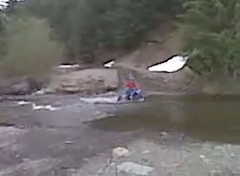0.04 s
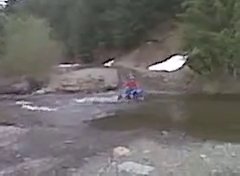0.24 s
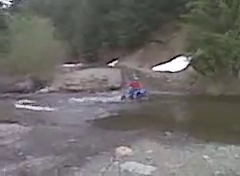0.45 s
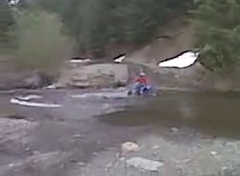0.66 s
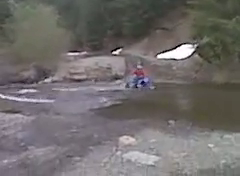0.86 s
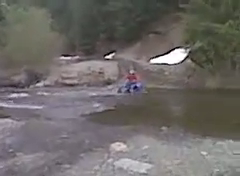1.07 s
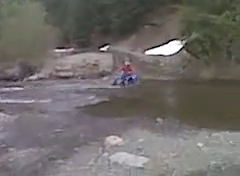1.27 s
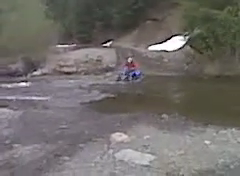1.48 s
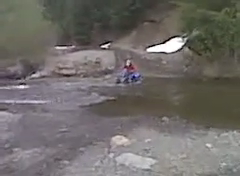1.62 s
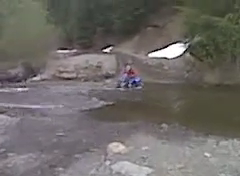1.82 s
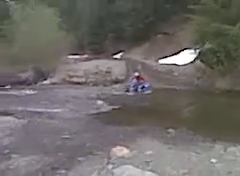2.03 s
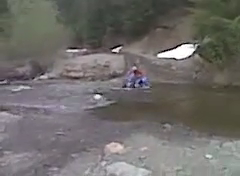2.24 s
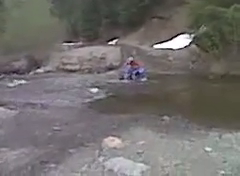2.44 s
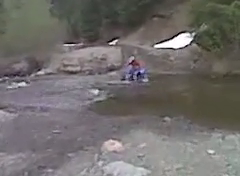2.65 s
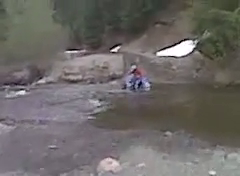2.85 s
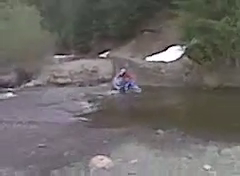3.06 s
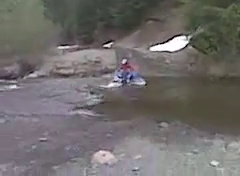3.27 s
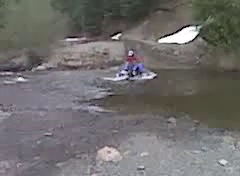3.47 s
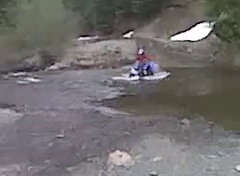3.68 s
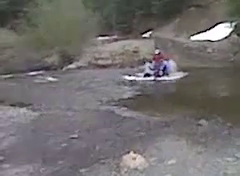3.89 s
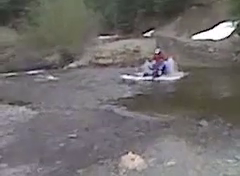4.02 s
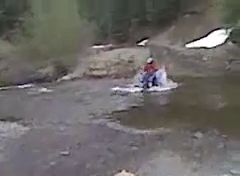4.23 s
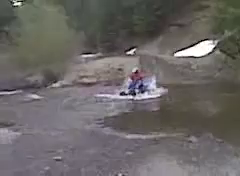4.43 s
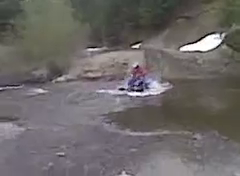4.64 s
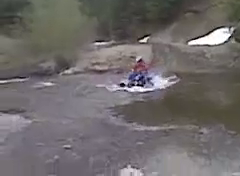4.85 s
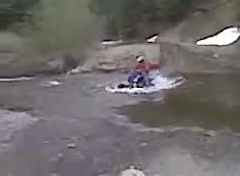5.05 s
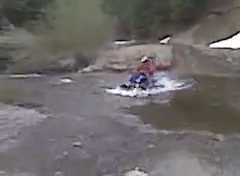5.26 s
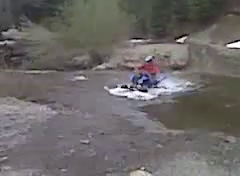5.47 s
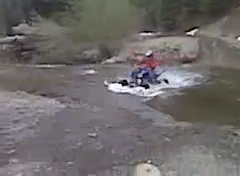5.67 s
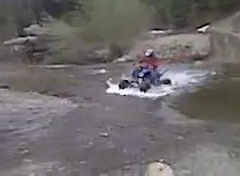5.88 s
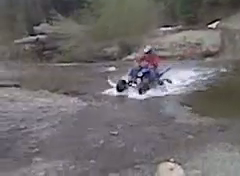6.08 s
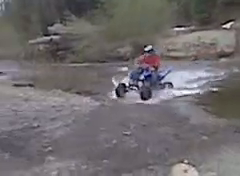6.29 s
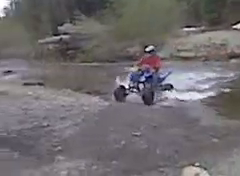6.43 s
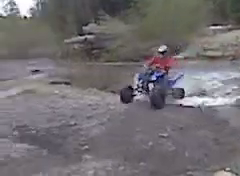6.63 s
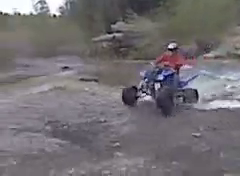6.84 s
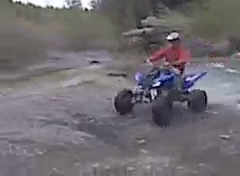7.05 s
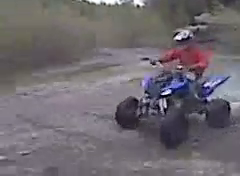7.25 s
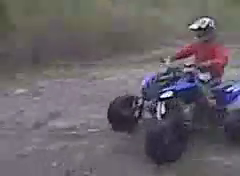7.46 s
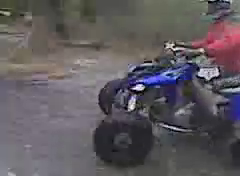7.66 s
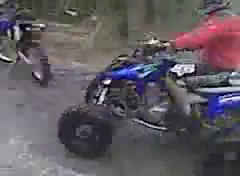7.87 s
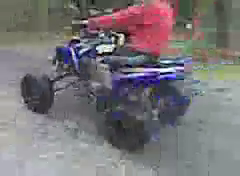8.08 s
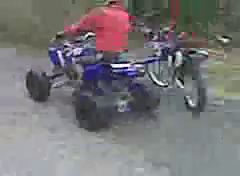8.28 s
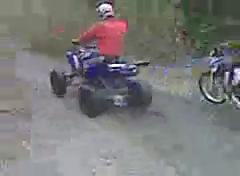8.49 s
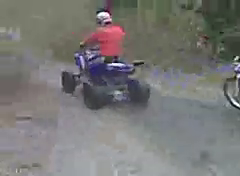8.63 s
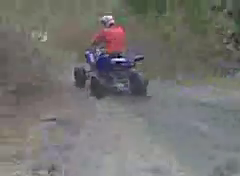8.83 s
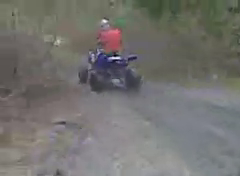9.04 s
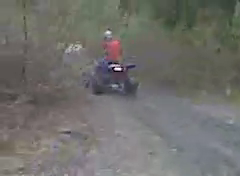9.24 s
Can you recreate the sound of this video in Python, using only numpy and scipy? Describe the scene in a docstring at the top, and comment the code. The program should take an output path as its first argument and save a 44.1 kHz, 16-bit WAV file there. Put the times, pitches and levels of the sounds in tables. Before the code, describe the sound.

Over a rushing creek, a quad bike engine revs up and down, splashes nearer, clatters loudly past on gravel and eases off.

```python
"""A single-cylinder quad bike idles across a creek, revs in surges through the water, climbs the gravel
bank, passes close to a small camera and rolls away off the throttle, its tailpipe popping.
Each firing sends a pulse down the exhaust and rattles the engine; the wheels throw water and stones.
The creek rushes underneath and the banks echo. The highs are cut and the sound overloads at the pass."""
import sys
import numpy as np
from scipy import signal
from scipy.fft import rfft, irfft, next_fast_len
from scipy.io import wavfile
from scipy.ndimage import uniform_filter1d, map_coordinates

SR = 44100
rng = np.random.default_rng(int(sys.argv[2]) if len(sys.argv) > 2 else 0)


def store_wav(level_fs):
    """Save 16-bit WAV to argv[1]."""
    pcm = np.round(np.clip(np.atleast_2d(level_fs), -1, 1) * 32767)
    wavfile.write(sys.argv[1], SR, pcm.T.astype(np.int16))


N = 410571
TIME = np.arange(N) / SR

# Engine speed. Each row: time in seconds, firings per second.
FIRING_RATE = [(0.0, 11.42), (0.88, 11.39), (0.96, 19.26), (1.1, 35.12), (1.25, 47.1), (1.38, 55.4),
               (1.52, 60.01), (1.63, 63.19), (1.7, 59.53), (1.9, 49.58), (2.1, 41.08), (2.34, 31.77),
               (2.45, 36.53), (2.62, 44.88), (2.76, 39.87), (3.03, 37.84), (3.3, 28.24), (3.42, 32.05),
               (3.6, 43.86), (3.76, 54.16), (3.9, 54.72), (4.01, 56.29), (4.13, 50.46), (4.28, 53.13),
               (4.5, 43.87), (4.8, 40.33), (4.97, 42.72), (5.3, 40.49), (5.53, 37.03), (5.82, 40.23),
               (6.08, 38.95), (6.3, 44.51), (6.55, 46.95), (6.8, 41.69), (6.98, 40.18), (7.21, 50.47),
               (7.34, 42.52), (7.52, 43.12), (7.72, 38.43), (7.9, 41.45), (8.04, 44.9), (8.22, 34.7),
               (8.55, 31.98), (8.85, 28.62), (9.31, 23.93)]
# Throttle moves, each briefly raising or lowering the bark and the boom.
# Each row: start and length in seconds, change of bark and of boom in dB.
TWISTS = [(0.948, .69, 8, 1), (1.752, 0.2, -0.5, -3.5), (2.159, 0.22, -8.5, -5.5), (2.409, 0.3, 2.5, 4),
          (2.712, .34, 3, 4), (3.091, 0.24, -2, -2.5), (3.386, 0.35, 5, 3), (3.771, 0.28, 8.5, -4.5),
          (4.058, .25, 3, 3), (4.689, 0.49, -5.5, 1), (5.993, 0.42, -2, 3), (7.03, 0.95, -4, 1),
          (7.636, .41, 6.5, 2.5), (8.079, 0.21, -2.5, -2)]
# Hard work makes burning ragged. Each row: time in seconds, added roughness from 0 to 1.
STRAIN = [(3.5, 0), (4.3, .04), (4.7, .12), (6.2, .12), (7.2, .25), (7.8, .1), (8.4, .01)]
# Pops and misfires off the throttle. Each row: time in seconds, dB against a normal firing.
POPS = [(8.572, 3.5), (8.604, 1.5), (8.635, 4), (8.801, 1.5), (8.835, -8), (8.978, -7), (9.169, 3),
        (9.21, -1.5)]
# The quad comes and goes. Each row: time in seconds, base levels of boom, bark and clatter in dB.
DRIVE_BY = [(.8, -45.5, -51, -38), (1.0, -24.5, -33.5, -39.5), (1.3, -28.5, -31.5, -35),
            (1.9, -25.5, -26, -34.5), (2.45, -30, -26.5, -38.5), (2.68, -30.5, -25.5, -40.5),
            (3.2, -26, -28.5, -34.5), (4.6, -21, -34.5, -31.5), (5.45, -22.5, -27.5, -29),
            (6.0, -21, -31.5, -28.5), (6.9, -19.5, -22, -24), (7.5, -27, -26, -19.5),
            (7.72, -28.5, -22, -14), (7.8, -29.5, -23.5, -14), (8.02, -32.5, -21.5, -12.5),
            (8.4, -32, -17, -16.5), (8.85, -27, -20.5, -22.5), (9.3, -30, -26.5, -24.5)]
# The tailpipe turns to the camera. Each row: time in seconds, share heard from behind from 0 to 1.
REAR_SHARE = [(7.3, 0), (8.1, 0), (8.35, .97), (9.3, 1)]
# Water over the tailpipe. Each row: time in seconds, flutter strength in dB (0 wavers by about 2 dB).
CHOKE = [(3.3, -6), (4.5, 7.5), (6.2, 0.5), (7, -16.5)]

# Ringing pitches that drift. Each row: time in seconds, pitch in Hz.
BARK_PEAK_PITCH = [(1.15, 813), (1.6, 883), (2.15, 726), (2.44, 954), (2.83, 790), (3.001, 878),
                   (3.131, 634), (3.599, 840), (4.0, 918)]  # a ringing peak in the exhaust bark wanders up and down
CASING_PITCH = [(5.6, 2470), (6.7, 2560), (7.349, 2690), (7.8, 2460), (7.952, 2320), (8.15, 2056)]  # shifts as the quad turns and passes

# Tone colours. Each row: frequency in Hz, relative level in dB.
CREEK_COLOUR = [(24, -51), (40, -13.5), (130, -12), (229, -3.5), (307, -2), (419, -5.5), (530, 0),
                (698, 0.5), (1140, 2), (1650, -7), (2130, -2.5), (3210, -8.5), (3690, -18.5), (4310, -37),
                (5600, -62), (9480, -120)]
BOOM_COLOUR = [(15, -77), (110, -25.5), (160, -15), (215, -0.5), (270, 2.5), (330, -1), (390, -17),
               (500, -10.5), (610, -5), (720, -24.5), (1200, -67.5)]
FRONT_BARK_COLOUR = [(60, -55.5), (250, -24), (340, -2.5), (400, -5), (470, 3), (540, 2), (620, 7),
                     (720, -8.5), (810, -5), (890, -1.5), (1020, -14), (1300, -26.5), (1700, -15),
                     (3300, -35.5), (4400, -61)]
REAR_BARK_COLOUR = [(60, -52.5), (250, -15.5), (420, -19.5), (550, -3.5), (660, 3.5), (780, 13), (900, -2),
                    (1200, 0), (1500, -10.5), (2700, 1), (3500, -12), (4400, -45.5)]
CLATTER_COLOUR = [(60, -50.5), (500, -6.5), (900, -4), (1250, -4), (1550, -8), (1900, -5.5), (2200, 0),
                  (2480, 0), (2750, -0.5), (3000, -5), (3350, -6.5), (3700, -16), (4400, -40)]
RUMBLE_COLOUR = [(12, -43.5), (45, -10), (80, -3), (130, -3), (250, -26.5), (600, -61.5)]
SPRAY_COLOUR = [(20, -55.5), (400, 10.5), (1100, 7.5), (1600, -9), (2500, -11.5), (3300, 1), (3800, -15.5),
                (4400, -41)]
SPLASH_COLOUR = [(300, -36.5), (1200, -19.5), (2600, 0.5), (3400, -12.5), (4400, -39)]
GRAVEL_COLOUR = [(20, -53.5), (160, -9), (320, -4.5), (430, -6), (650, 1), (1000, 2), (1300, 0),
                 (1600, -15), (2600, -11.5), (4400, -43.5)]

# How sounds swell and fade. Each row: time in seconds, base level in dB.
RUMBLE_LEVEL = [(0, -61.5), (2.5, -53.5), (4.2, -50), (7.3, -44.5), (9.3, -40.5)]
SPRAY_LEVEL = [(1.1, -40.5), (1.4, -40.5), (3.3, -33), (3.9, -34), (5, -34.5), (6.2, -29), (7.4, -46)]
GRAVEL_LEVEL = [(3.6, -44.5), (5.9, -44.5), (6.7, -26.5), (7.22, -17), (7.5, -23), (8.3, -18), (9.3, -25)]
CHAIN_LEVEL = [(5.2, -41), (6.55, -39.5), (6.7, -27), (6.95, -28), (7.3, -17.5), (7.42, -22.5), (7.6, -48)]
INTAKE_LEVEL = [(7.6, -32), (7.74, -21), (7.775, -6), (7.92, -6.3), (8.06, -6.5), (8.09, -14), (8.14, -28)]  # loud while the intake faces the camera

# How chain links and airbox ring. Each row: pitch in Hz, width in Hz, relative level in dB.
LINK_MODES = [(2660, 300, 0)]
AIRBOX_MODES = [(619, 58, 16.5), (312, 60, 5), (2440, 170, 7)]

# Engine rasps. Each row: start and length in seconds, level in dB, pitch in Hz.
RASPS = [(1.535, .105, -29, 3100), (1.595, .17, -33.5, 2480), (3.67, .57, -41, 3280),
         (4.33, .19, -35, 2660)]
# Wheels slap the water. Each row: start in seconds, base level in dB, centre pitch in Hz.
SPLASHES = [(3.625, -29, 2900), (3.69, -25, 2570), (4.05, -28, 2000), (4.225, -20.5, 2560),
            (5.38, -25, 2650), (5.8, -29.5, 2600), (6.3, -21.5, 2590), (6.68, -22, 2650)]
# Bubbles at the tailpipe. Each row: start in seconds, base level in dB.
GLUGS = [(4.468, -17), (4.72, -17), (4.748, -16), (5.097, -16), (5.18, -18), (5.428, -12), (5.452, -17),
         (6.018, -13), (6.062, -16), (6.118, -13), (6.282, -13)]
# A steel part rings. Each row: start and length in seconds, level in dB.
STEEL_RINGS = [(6.994, .36, -18.5), (7.696, 0.19, -18.5)]
# Stones hit the chassis. Each row: start in seconds, relative level in dB.
KNOCKS = [(7.15, 4), (7.224, -1), (7.256, 1.5), (7.441, -3), (7.521, -3.5)]

CRUISE_HZ, TOP_SPEED_HZ = 40, 62.6  # firings per second
WRIST_S = .04  # the time a twist takes


def amp(db):
    """Turn decibels into a gain."""
    return 10 ** (np.asarray(db) / 20)


def unit(x):
    """Scale to an average power of 1."""
    return x / np.sqrt(np.mean(x ** 2) + 1e-20)


def curves(rows):
    """One value per sample for each column after the time."""
    times, *columns = np.transpose(rows)
    return [np.interp(TIME, times, column) for column in columns]


def swell(rows):
    """Gain that follows a level table and fades out beyond its ends."""
    outside = np.maximum(rows[0][0] - TIME, 0) + np.maximum(TIME - rows[-1][0], 0)
    return amp(curves(rows)[0] - 120 * outside)


def gate(start, length, fade):
    """Fade from 0 to 1 at start and back after length; all in seconds."""
    return np.clip(np.minimum(TIME - start, start + length - TIME) / fade + .5, 0, 1)


def wobble(rate):
    """A smooth curve through rate random points a second."""
    return map_coordinates(rng.standard_normal(int(N * rate / SR) + 4), [TIME * rate])


def coloured(x, colour, size=8192):
    """Filter x to a tone colour, at power 1."""
    hz, db = np.transpose(colour)
    log_gain = np.log(amp(np.interp(np.log(np.fft.rfftfreq(size, 1 / SR) + 1), np.log(hz), db)))
    cepstrum = irfft(log_gain) * (1 + np.sign(size / 2 - np.arange(size)))  # no ringing before a hit
    response = irfft(np.exp(rfft(cepstrum)))[:size // 2]
    return unit(signal.oaconvolve(x, response)[:N])


def resonate(x, modes):
    """Let x ring at fixed pitches, at power 1."""
    t = TIME[:SR // 4]
    ring = sum(amp(db) * width * np.exp(-np.pi * width * t) * np.cos(2 * np.pi * hz * t)
               for hz, width, db in modes)
    return unit(signal.oaconvolve(x, ring)[:N])


def peaked(x, pitches, width_hz, peak_db, waver_hz):
    """Boost x around a moving, wavering pitch, at power 1."""
    turn = np.exp(2j * np.pi * np.cumsum(curves(pitches)[0] + waver_hz * wobble(13)) / SR)
    keep = np.exp(-np.pi * width_hz / SR)
    ring = 2 * (turn * signal.lfilter([1 - keep], [1, -keep], x / turn)).real
    return unit(x + (amp(peak_db) - 1) * ring)


def doublings(speed):
    """How many times the speed has doubled from cruising."""
    return np.log2(speed / CRUISE_HZ)


def creek():
    """Shallow water ripples steadily over stones."""
    ripple_db = 1.7 * wobble(120) + .4 * wobble(3)
    return amp(-38.5) * coloured(rng.standard_normal(N) * amp(ripple_db), CREEK_COLOUR)


def roughness(speed):
    """How ragged the burning is, from 0 to 1: more at low speed and under strain."""
    ragged = np.minimum(.06 * (CRUISE_HZ / speed) ** 2.2, .4)
    return np.clip(ragged + curves(STRAIN)[0], 0, 1)


def firings(cycles, rough, scatter_db, limp_db):
    """One kick a cycle; ragged burning scatters the sizes, and a limp weakens every other one."""
    at = np.flatnonzero(np.diff(np.floor(cycles)) > 0)
    db = scatter_db * np.sqrt(rough[at]) * rng.standard_normal(len(at))
    db += limp_db * (-1) ** np.arange(len(at))
    for start, pop_db in POPS:
        db[np.argmin(np.abs(at / SR - start))] = pop_db
    return unit(np.bincount(at, amp(db) * np.sqrt(np.gradient(at)), N))  # same power at any speed


def gusts(kicks, life_s, floor):
    """Rushing noise flares at each kick and dies back to a steady floor."""
    power = signal.lfilter([1], [1, -np.exp(-2 / (life_s * SR))], kicks ** 2)
    return unit(np.sqrt(power / power.mean() + floor) * rng.standard_normal(N))


def puffs(kicks, rough, life_s, floor):
    """Each puff mixes a clean pressure kick with its gust of noise."""
    share = np.clip(rough, 0, 1)
    return np.sqrt(1 - share) * kicks + np.sqrt(share) * gusts(kicks, life_s, floor)


def pipe(x, round_trip_s, bounce):
    """Each pulse runs up and down the pipe, and part escapes on every trip."""
    size = next_fast_len(N + SR // 4)
    delay = np.exp(-2j * np.pi * np.fft.rfftfreq(size, 1 / SR) * round_trip_s)
    return irfft(rfft(x, size) * (delay - bounce) / (1 - bounce * delay), size)[:N]


def boom(cycles, rough):
    """The pulses boom low in the silencer."""
    thumps = firings(cycles, rough, scatter_db=2.5, limp_db=-.74)
    gas = puffs(thumps, 2.38 * rough, life_s=.02, floor=.08)
    return coloured(pipe(gas, round_trip_s=.003686, bounce=.42), BOOM_COLOUR)


def bark(cycles, rough):
    """The pulses bark from the pipe, more sharply when heard from behind."""
    kicks = firings(cycles, rough, scatter_db=6, limp_db=-.5)
    front = puffs(kicks, .4 * rough, life_s=.008, floor=.05)
    front = coloured(pipe(front, round_trip_s=.0036, bounce=.74), FRONT_BARK_COLOUR)
    front = peaked(front, BARK_PEAK_PITCH, width_hz=100, peak_db=10.5, waver_hz=24)
    front *= amp(2 * swell(CHOKE) * wobble(13))  # water chokes the pipe unevenly
    back = puffs(kicks, 3 * rough, life_s=.006, floor=.002)
    back = coloured(pipe(back, round_trip_s=.003, bounce=.58), REAR_BARK_COLOUR)
    rear, = curves(REAR_SHARE)
    return amp(-2.5) * np.sqrt(1 - rear) * front + amp(-.3) * np.sqrt(rear) * back


def drone(cycles):
    """The pipe drones at four times the firing rate."""
    return np.sqrt(2) * np.sin(8 * np.pi * cycles + .15 * wobble(45)) * amp(1.8 * wobble(55))


def exhaust(cycles, rough, speed, twist_bark_db, twist_boom_db):
    """Boom, bark and drone grow with speed; near the top, an open throttle hardens the bark."""
    gain_hz_per_s = uniform_filter1d(np.gradient(speed), round(WRIST_S * SR)) * SR
    opening = np.clip(gain_hz_per_s / 7, 0, 1)  # open while the engine speeds up
    flat_out = np.exp(np.minimum(speed - TOP_SPEED_HZ, 0) / 3.2)  # 1 at top speed
    boom_db, bark_db, _ = curves(DRIVE_BY)
    boom_db += twist_boom_db + 1.5 * doublings(speed)
    bark_db += twist_bark_db + 3.5 * doublings(speed) + 7 * opening * flat_out
    too_slow_db = 2.5 * np.maximum(52 - speed, 0)  # the drone fades below 52 firings a second
    drone_db = boom_db - 2.5 + 11 * flat_out - too_slow_db
    return (amp(boom_db - 3) * boom(cycles, rough) + amp(bark_db) * bark(cycles, rough)
            + amp(drone_db) * drone(cycles))


def ticking(cycles):
    """Valves and chain tick unevenly, six times a cycle."""
    at = np.flatnonzero(np.diff(np.floor(6 * cycles)) > 0)
    return unit(np.bincount(at, amp(2.4 * rng.standard_normal(len(at))), N))


def clatter(cycles, rough, speed, ticks, twist_boom_db):
    """Firings and ticks rattle the engine casing."""
    kicks = firings(cycles, rough, scatter_db=6, limp_db=4.5)
    rattle = gusts(kicks, life_s=.043, floor=.57) + amp(-1.5) * gusts(ticks, life_s=.0039, floor=.051)
    casing = peaked(coloured(rattle, CLATTER_COLOUR), CASING_PITCH, width_hz=150, peak_db=5, waver_hz=70)
    db = curves(DRIVE_BY)[2] - .5 + 6 * doublings(speed) + .11 * twist_boom_db
    db -= 4 * curves(REAR_SHARE)[0]  # the body hides the casing from behind
    return amp(db + 1.2 * wobble(18) + wobble(4.4)) * casing


def wheels(speed):
    """Tyres rumble, throw clumps of spray and crunch over gravel, louder with speed."""
    rumble = swell(RUMBLE_LEVEL) * amp(2) * coloured(rng.standard_normal(N), RUMBLE_COLOUR)
    drops = rng.standard_normal(N) * amp(3.2 * wobble(300) + 1.5 * wobble(12))
    spray = swell(SPRAY_LEVEL) * coloured(drops, SPRAY_COLOUR)
    grit = rng.standard_normal(N) * amp(2.7 * wobble(200))
    crunch = swell(GRAVEL_LEVEL) * coloured(grit, GRAVEL_COLOUR)
    return amp(16 * doublings(speed)) * (rumble + spray + crunch)


def bank_echo(x, decay_s=.18, rise_s=.025):
    """Rocks and trees scatter a short echo back."""
    t = TIME[:SR // 2]
    tail = rng.standard_normal(len(t)) * amp(-60 * t / decay_s) * (1 - np.exp(-t / rise_s))
    return signal.oaconvolve(x, tail / np.linalg.norm(tail))[:N]


def rasp(cycles, speed, lead_cycles=.3, rise_s=.0032):
    """Under hard load the engine rings in a short metallic burst just ahead of each firing."""
    age = (cycles + lead_cycles) % 1 / speed
    burst = unit(age * np.exp(-age / rise_s) * amp(1.2 * wobble(60)))
    smear = 1.15 * wobble(420)
    tones = sum(amp(db) * gate(start, length, WRIST_S) * np.sin(2 * np.pi * hz * age + smear)
                for start, length, db, hz in RASPS)
    return np.sqrt(2) * burst * tones


def splashes(decay_s=.087, rise_s=.015):
    """The wheels slap up bursts of drops."""
    slaps = np.zeros(N)
    for start, db, _ in SPLASHES:
        age = np.maximum(TIME - start, 0)
        slaps += amp(db - 60 * age / decay_s) * (1 - np.exp(-age / rise_s))
    drops = coloured(rng.standard_normal(N) * amp(5.1 * wobble(430)), SPLASH_COLOUR)
    pitches = [(start, hz) for start, _, hz in SPLASHES]
    return slaps * peaked(drops, pitches, width_hz=220, peak_db=13, waver_hz=30)


def glugs(bubble_hz=614, decay_s=.058, rise_s=.0014):
    """Single firings burst through water over the tailpipe, each blowing a ringing bubble."""
    bubbles, t = np.zeros(N), TIME[:SR // 10]
    fade = amp(-60 * t / decay_s) * (1 - np.exp(-t / rise_s))
    for start, db in GLUGS:
        hz = bubble_hz * (1 + .094 * rng.standard_normal())
        bubbles[round(start * SR):][:len(t)] += amp(db) * fade * np.sin(2 * np.pi * hz * t)
    return bubbles


def chain(ticks):
    """The drive chain sings under load as ticks ring its links."""
    rattle = gusts(ticks, life_s=.0043, floor=.1)
    return swell(CHAIN_LEVEL) * resonate(resonate(rattle, LINK_MODES), LINK_MODES)


def steel_ring(pitch_hz=1258, waver_hz=7):
    """A steel part rings with a wavering tone."""
    level = sum(amp(db) * gate(start, length, fade=.015) for start, length, db in STEEL_RINGS)
    phase = 2 * np.pi * np.cumsum(pitch_hz + waver_hz * wobble(40)) / SR
    return level * np.sin(phase) * amp(2.5 * wobble(45))


def knocks(pitches_hz=(720, 830, 1400, 2300), decay_s=.018, rise_s=.00063):
    """Stones strike the chassis, which rings briefly."""
    blows, t = np.zeros(N), TIME[:SR // 10]
    fade = amp(4 - 60 * t / decay_s) * (1 - np.exp(-t / rise_s))
    ring = fade * np.mean([np.cos(2 * np.pi * hz * t) for hz in pitches_hz], axis=0)
    for start, db in KNOCKS:
        blows[round(start * SR):][:len(t)] += amp(db) * ring
    return blows


def intake(cycles, rough):
    """Even gulps of air ring through duct and airbox as a honk."""
    gulps = firings(cycles, rough, scatter_db=1.5, limp_db=0)
    air = puffs(gulps, .04, life_s=.008, floor=.2)
    return swell(INTAKE_LEVEL) * resonate(resonate(air, AIRBOX_MODES), AIRBOX_MODES)


def scene():
    """The quad, timed by its firing rate, plays over its echo and the creek."""
    twist_bark_db, twist_boom_db = sum(np.outer(changes_db, gate(start, length, WRIST_S))
                                       for start, length, *changes_db in TWISTS)
    speed, = curves(FIRING_RATE)
    cycles = .09 + np.cumsum(speed) / SR  # one cycle is one firing, or two turns of the crank
    rough, ticks = roughness(speed), ticking(cycles)
    quad = (exhaust(cycles, rough, speed, twist_bark_db, twist_boom_db)
            + clatter(cycles, rough, speed, ticks, twist_boom_db) + wheels(speed) + rasp(cycles, speed)
            + splashes() + glugs() + chain(ticks) + steel_ring() + knocks() + intake(cycles, rough))
    echo_db = np.interp(TIME, [6, 8], [-13, -18])  # weaker as the quad comes near
    return (quad + amp(echo_db) * bank_echo(quad) + creek())[None]


def low_pass(x, hz):
    """Nothing passes above hz."""
    size = next_fast_len(N + SR // 4)
    return irfft(rfft(x, size) * (np.fft.rfftfreq(size, 1 / SR) < hz), size)[..., :N]


def record(dry):
    """Loud peaks are squeezed, the highs are cut, and the loudest peaks clip with a faint crackle."""
    squeezed = dry / (1 + (np.abs(dry) / 1.09) ** 6) ** (1 / 6)
    clipped = np.clip(low_pass(squeezed, hz=4463), -1, 1)
    return low_pass(clipped, hz=17000)


dry = scene()
out = record(dry)
store_wav(out)
```